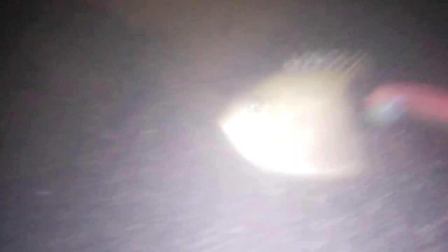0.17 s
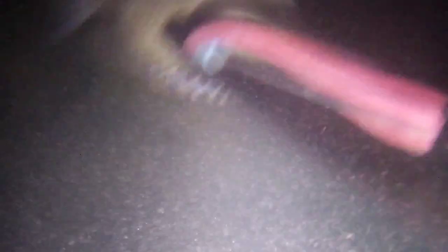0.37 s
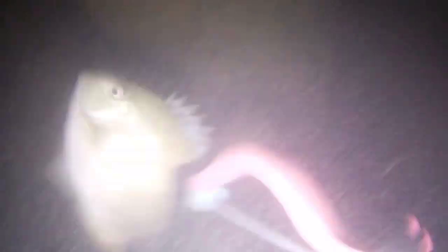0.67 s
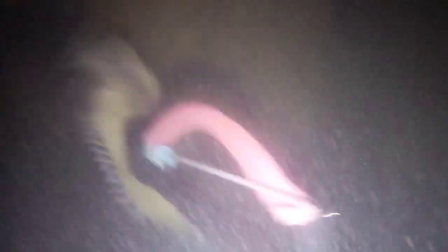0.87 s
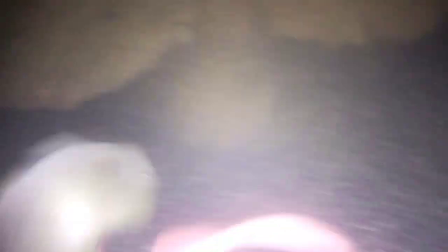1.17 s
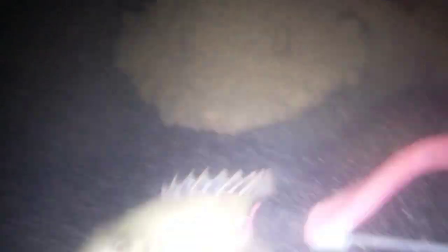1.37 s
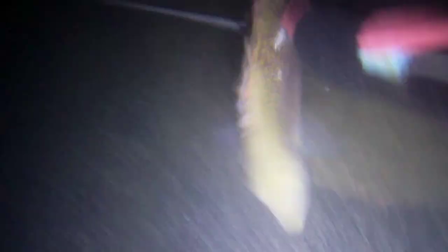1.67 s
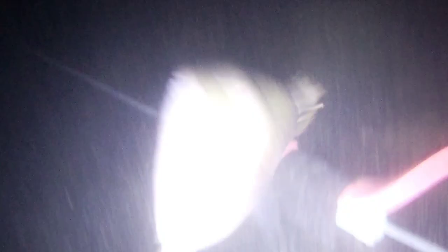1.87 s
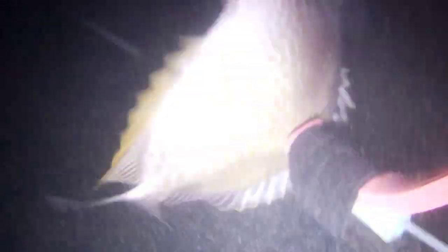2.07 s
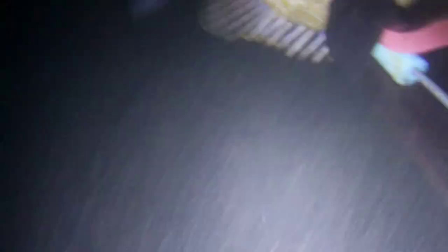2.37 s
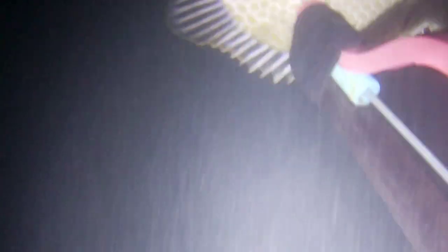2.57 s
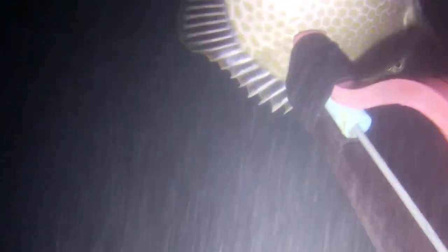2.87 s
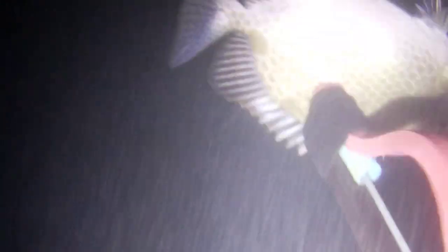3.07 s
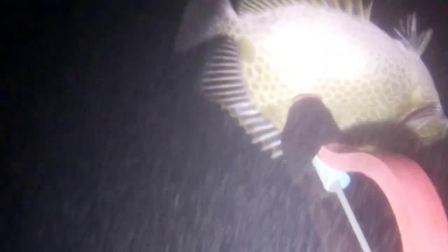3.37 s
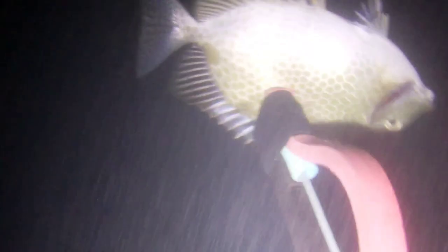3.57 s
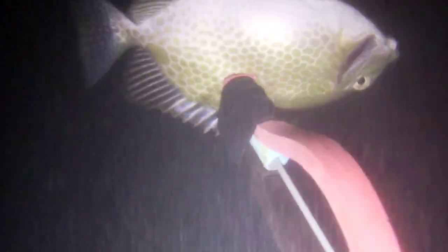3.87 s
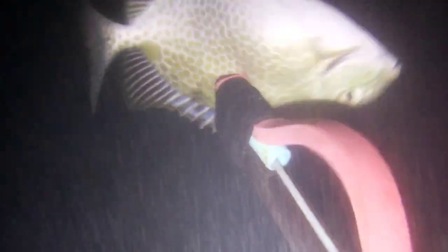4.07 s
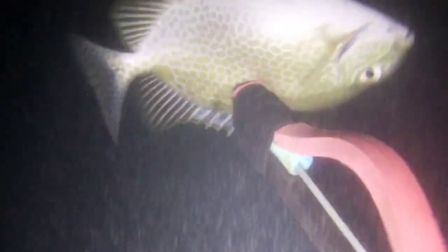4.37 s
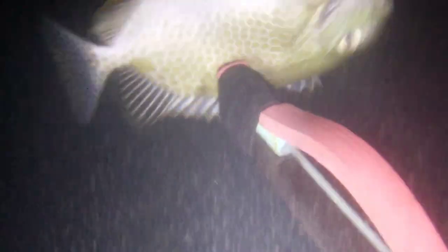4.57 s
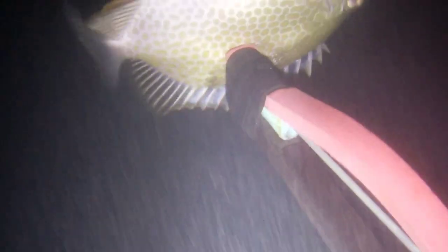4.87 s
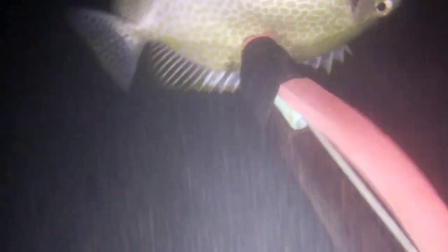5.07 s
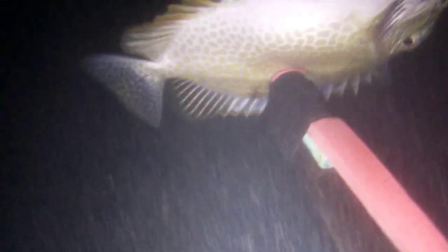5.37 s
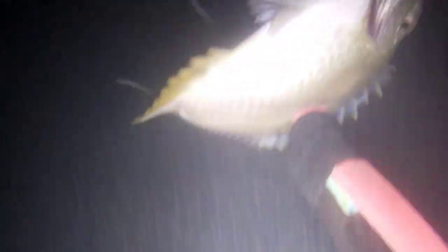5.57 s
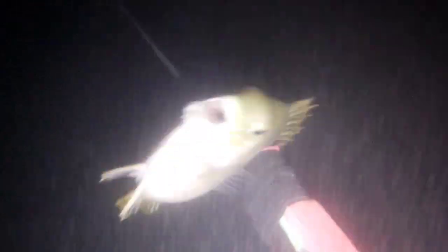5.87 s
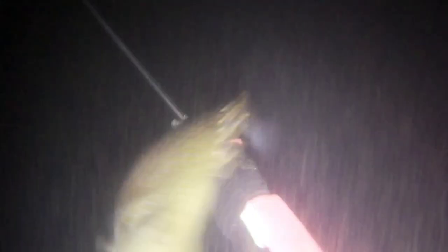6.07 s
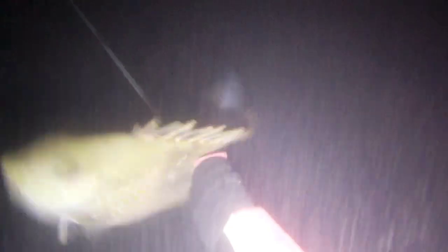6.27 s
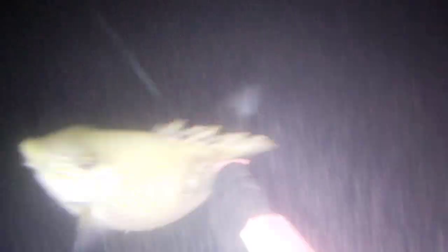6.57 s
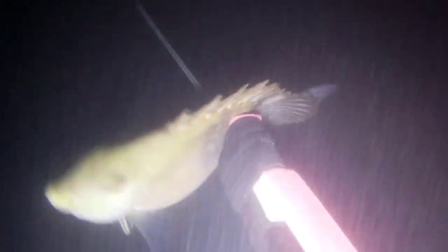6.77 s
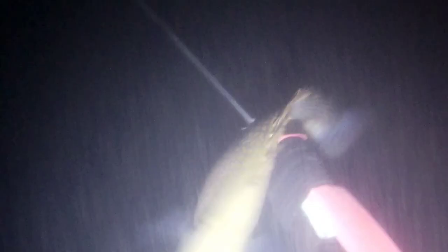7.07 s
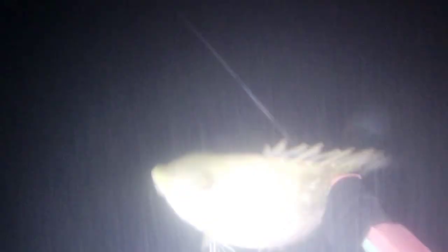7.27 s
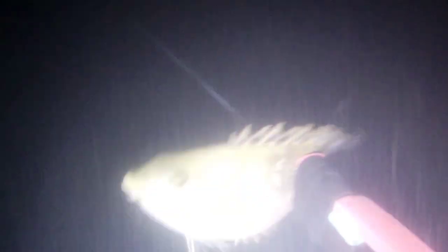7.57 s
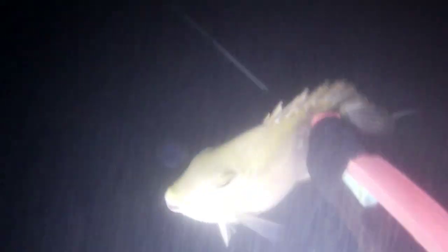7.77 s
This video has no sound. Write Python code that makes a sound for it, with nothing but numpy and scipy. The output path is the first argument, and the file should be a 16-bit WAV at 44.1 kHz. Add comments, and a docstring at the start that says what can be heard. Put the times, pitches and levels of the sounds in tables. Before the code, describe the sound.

Heard under water through a sealed housing on a speargun, muffled, close and almost mono. From 0 to 1.3 seconds a speared fish thrashes hard: hollow knocks crowd together, loudest around 0.5 to 0.8 and near 1.1, with deep thumps, sharp metallic ticks, gritty band-and-line rubbing and churning, rumbling water. It eases to scattered bumps until 2.3, then a quieter stretch of small ticks and fine rattle, with a brief shaft hum near 2.7 and a lower one at 3.0. From 3.1 to 4.5 heavy low thuds return in irregular tugs, with dull clunks, scrapes and short hums around 4. More clicks and knocks follow around 5.1 to 5.8, the shaft humming low from about 5.4. After 6 the jerks soften into lighter knocks, ticks and rubs until about 8, over fine watery snaps, fading rumble and faint steady hiss.

```python
"""Under water, a microphone in a sealed housing rides on a speargun while a fish struggles on the shaft.
Jerks along the gun make low dying swings (thumps), short tone-and-noise contacts (dull knocks) and
millisecond noise bursts (sharp ticks); knocks and ticks ring the housing. Band and line rub in dense
random slips and the shaft hums in near-sines. Water churns, rumbles, snaps and hisses as shaped noise.
The one microphone feeds both channels, which differ only by a faint scatter."""
import sys
import numpy as np
from scipy import signal
from scipy.fft import rfft, irfft
from scipy.io import wavfile

SR = 44100
rng = np.random.default_rng(int(sys.argv[2]) if len(sys.argv) > 2 else 0)


def unload_audio(sound):
    """Save the sound as a 16-bit wav file, at the path given as the first command line argument."""
    columns = np.transpose(np.atleast_2d(sound))
    # keep every value between -1 and 1, then stretch to whole-number steps
    steps = np.round(np.clip(columns, -1, 1) * 32767)
    wavfile.write(sys.argv[1], SR, steps.astype(np.int16))


N = 348390  # length of the scene in samples


def amp(db):
    """Turn decibels into a gain."""
    return 10 ** (np.asarray(db) / 20)


def rms_one(x):
    """Scale a sound to an rms level of 1."""
    return x / np.sqrt(np.mean(x ** 2) + 1e-20)


def in_time(rows):
    """Join the points of each curve column by straight lines, one value per sample."""
    times, *columns = np.transpose(rows)
    return [np.interp(np.arange(N) / SR, times, column) for column in columns]


def band(x, low_hz, high_hz, order=2):
    """Keep mainly the sound between two frequencies."""
    sos = signal.butter(order, [low_hz, high_hz], "band", fs=SR, output="sos")
    return signal.sosfilt(sos, x)


def coloured(spectrum):
    """Shape white noise to a given spectrum, then scale it to rms 1."""
    hz, db = np.transpose(spectrum)
    grid_hz = np.arange(N // 2 + 1) * SR / N + 1  # 1 Hz up, so the logarithm exists at the bottom
    gain = amp(np.interp(np.log(grid_hz), np.log(hz), db))
    return rms_one(irfft(rfft(rng.standard_normal(N)) * gain, N))


def drift(rate_hz):
    """Smooth noise twice into a slow random wander of rms 1; a higher rate wanders faster."""
    r = np.exp(-2 * np.pi * rate_hz / SR)
    wander = signal.lfilter([1], [1, -2 * r, r * r], rng.standard_normal(N + SR))
    return rms_one(wander[SR:])  # the first second only settles the filter


def resonance(x, hz, width_hz):
    """Ring one two-pole resonance with a gain of about 1 at its top; a narrow one rings longer."""
    r = np.exp(-np.pi * width_hz / SR)
    feed = (1 - r * r) / 2 * np.array([1, 0, -1])
    return signal.lfilter(feed, [1, -2 * r * np.cos(2 * np.pi * hz / SR), r * r], x)


def housing(x):
    """Ring the housing's modes side by side; their equal signs leave dark notches between them."""
    # ways the housing rings: (frequency [Hz], width [Hz], gain [dB])
    modes = [(242.8, 47, 0), (380, 423, 0.5), (539.7, 44, 5.5), (807, 167, 4.5), (864, 50, -1.5),
             (1120, 440, -39.5), (1880.5, 94, 11), (2355, 186, -4.5), (2640, 720, 1.5), (3250, 250, -17),
             (3840, 200, -12), (4880, 220, -9.5), (5550, 406, -3), (6000, 290, -49.5)]
    return sum(amp(db) * resonance(x, hz, width_hz) for hz, width_hz, db in modes)


def add(out, start_s, shape, peak_db):
    """Lay a short sound into the layer, scaled to its peak level."""
    at = max(round(start_s * SR), 0)
    scaled = amp(peak_db) * shape / np.abs(shape).max()
    out[at:at + len(shape)] += scaled[:N - at]


def struggle():
    """The fish tugs: levels of rub, rattle and water in dB rise, peak and fade over the calm levels."""
    # tugs: (peak time [s], base time to fade 20 dB [s], dull rub [dB], fine rattle [dB], water [dB])
    tugs = [(0.1, 0.15, -28, -40.5, -24.5), (0.33, .12, -30.5, -43.5, -24.5),
            (0.539, 0.28, -24, -36.5, -23), (0.729, 0.035, -21.5, -34, -28.5), (0.77, 0.11, -21, -35, -28),
            (0.955, .14, -20.5, -34, -30.5), (1.07, 0.06, -44, -54, -21.5), (1.2, 0.24, -29.5, -42.5, -28),
            (1.63, 0.33, -31.5, -41.5, -32), (1.89, 0.22, -37.5, -45, -31), (2.72, 0.1, -43, -38.5, -50),
            (3.03, 0.47, -34, -44, -33.5), (3.37, 0.1, -31, -39.5, -31), (3.6, .25, -34, -42.5, -37.5),
            (3.899, 0.2, -33, -48, -33), (4.25, 0.14, -30.5, -40.5, -29.5), (4.51, .2, -34, -44, -30),
            (4.59, 0, -39, -43, -44), (4.79, 0.33, -40, -41.5, -34.5), (5.12, 0.08, -29, -37.5, -39),
            (5.25, 0, -32.5, -43, -44), (5.34, .1, -48, -41.5, -38), (5.45, 0.14, -29.5, -37, -28),
            (5.83, 0.15, -30.5, -42.5, -33), (6.211, 0.13, -32.5, -45, -42), (6.5, .18, -34, -42.5, -39),
            (6.64, .06, -48, -43.5, -54), (6.83, .3, -35, -42.5, -33), (7.23, 0.3, -33.5, -44, -30.5),
            (7.529, 0.27, -35, -44, -38.5)]
    # speed of the rise: (rub [dB/s], rattle [dB/s], water [dB/s])
    rise = np.array((330, 200.5, 280))[:, None]
    # how much the base fade time is stretched: (rub [factor], rattle [factor], water [factor])
    linger = np.array((1.033, 1.23, 2.1))[:, None]
    # levels between tugs: (time [s], dull rub [dB], fine rattle [dB], water [dB])
    calm = [(0, -44, -52, -29), (1.1, -44.5, -56, -30.5), (1.5, -41.5, -50, -30.5),
            (2.2, -42, -43.5, -36.5), (2.65, -54.5, -46, -43.5), (3.5, -57, -46, -42),
            (4.1, -46.5, -43, -33.5), (4.7, -59, -47, -48), (5.1, -54.5, -48, -42), (5.7, -48, -44, -33.5),
            (6.15, -52.5, -48, -52), (6.4, -47, -49, -44), (6.75, -68, -56, -51), (7.1, -57, -47, -53),
            (7.9, -63, -55, -50)]
    t, power = np.arange(0, N, 32) / SR, 0  # every 32nd sample is enough for a level
    for s, fade_s, *peak_db in tugs:
        loss_db = np.where(t < s, rise * (s - t), 20 * (t - s) / (fade_s * linger))
        power = power + amp(np.array(peak_db)[:, None] - loss_db) ** 2
    tugged = [np.interp(np.arange(N) / SR, t, p) for p in power]
    return 10 * np.log10(tugged + amp(in_time(calm)) ** 2)


def thumps():
    """Each jerk swings the whole gun: a soft rise, then a few dying cycles that sag in pitch."""
    # jerks: (time [s], peak level [dB], swing frequency at the start [Hz])
    jerks = [(0.089, -23, 55.4), (0.548, -15, 42), (0.618, -12.5, 200), (0.679, -17, 105),
             (1.044, -16, 42.3), (1.118, -18, 46.7), (1.2, -11.5, 63), (1.522, -14.5, 46.3),
             (1.779, -19.5, 40), (1.871, -16, 39.7), (2.167, -19, 37.7), (2.312, -19, 260),
             (3.113, -10, 64), (3.343, -10.5, 62), (3.581, -11, 62), (3.768, -21, 121), (3.799, -14.5, 117),
             (3.877, -14, 79), (3.9, -12.5, 96), (4.037, -13, 108), (4.144, -11.5, 109), (4.188, -14, 115),
             (4.421, -15.5, 112), (4.485, -20, 53), (4.763, -19.5, 47.7), (4.776, -18.5, 110),
             (5.091, -19.5, 50.7), (5.232, -20, 100), (5.336, -18.5, 86), (5.428, -14, 118),
             (5.827, -22.5, 53.3), (6.193, -25, 47.3), (6.229, -20.5, 123), (6.476, -16.5, 56.5),
             (6.722, -25, 113), (6.822, -29, 42), (7.178, -23.5, 38), (7.508, -25, 79)]
    out, t = np.zeros(N), np.arange(SR // 4) / SR
    start_phases = rng.normal(3.47, 0.68, len(jerks))  # radians
    for (s, db, hz), phase in zip(jerks, start_phases):
        turns = t * hz
        rise = 1 - np.exp(-(turns / 0.36) ** 2)
        decay = amp(-6.0 * turns - 280.0 * t)  # 6 dB per turn plus 280 dB per second
        swing = np.sin(2 * np.pi * turns * (1 - 1.3 * t) + phase)
        add(out, s - .001, rise * decay * swing, db)  # starts 1 ms ahead of the listed time
    return out


def knocks():
    """A contact of a few ms with a scraping tail, coloured around its centre, rings the housing modes."""
    # dull knocks: (time [s], peak level [dB], centre frequency [Hz])
    dull_hits = [(0.038, -17.5, 503), (0.083, -28, 460), (0.105, -10.5, 550), (0.273, -22.5, 406),
                 (0.416, -19, 927), (0.472, -14, 308), (0.523, -5.5, 602), (0.62, -5, 334),
                 (0.76, -10.5, 231), (0.807, -7.5, 342), (0.835, -8, 600), (0.911, -15.5, 970),
                 (0.949, -15, 560), (1.039, -8.5, 560), (1.117, -5, 936), (1.196, -9.5, 770),
                 (1.406, -24, 834), (1.607, -23.5, 816), (1.677, -20.5, 363), (1.826, -16.5, 790),
                 (1.873, -13, 450), (1.898, -15, 440), (2.121, -20.5, 440), (2.311, -16, 500),
                 (2.704, -24, 856), (3.009, -23.5, 520), (3.077, -23, 447), (3.113, -20.5, 766),
                 (3.308, -26.5, 830), (3.342, -21, 513), (3.377, -12.5, 510), (3.58, -23, 817),
                 (3.878, -11, 466), (3.919, -18, 850), (4.191, -18, 484), (4.226, -24, 850),
                 (4.42, -19, 261), (4.478, -20.5, 520), (4.524, -15, 770), (4.762, -16.5, 230),
                 (4.778, -14.5, 450), (4.853, -22.5, 736), (5.023, -32, 800), (5.094, -24, 710),
                 (5.116, -14.5, 780), (5.193, -27.5, 323), (5.234, -17.5, 233), (5.433, -12, 744),
                 (5.594, -28, 564), (5.621, -17, 385), (5.8, -19.5, 578), (5.835, -12.5, 967),
                 (5.951, -23.5, 566), (6.189, -18, 380), (6.302, -19.5, 1027), (6.352, -20, 613),
                 (6.483, -24.5, 512), (6.572, -23.5, 940), (6.607, -19, 970), (6.721, -22, 332),
                 (6.792, -23, 390), (6.826, -21.5, 400), (6.895, -24, 534), (7.267, -21.5, 503),
                 (7.387, -19.5, 876), (7.512, -16, 570), (7.626, -20.5, 986)]
    out, t = np.zeros(N), np.arange(SR // 10) / SR
    grit = rng.standard_normal((len(dull_hits), len(t)))
    contact = t / .002 * np.exp(-t / 0.0023)
    scrape = .025 * np.exp(-t / 0.071)
    shapes = []
    for (s, db, hz), noise in zip(dull_hits, grit):
        tone = contact * np.sin(2 * np.pi * hz * t)
        rough = (contact + scrape) * 2.8 * band(noise, hz / 2.1, hz * 1.61)
        shapes.append(tone + rough)
    for (s, db, hz), shape in zip(dull_hits, housing(np.array(shapes))):
        add(out, s - .001, shape, db)
    return out


def ticks():
    """Metal touches: a millisecond of noise with a faint scratchy tail rings the upper housing modes."""
    # sharp ticks: (time [s], peak level [dB], treble share, held below 0.98 [dB])
    touches = [(0.0394, -17, -13.5), (0.086, -17, -30), (0.2347, -24.5, -2.5), (0.401, -29, -1),
               (0.415, -13, -27), (0.4642, -14.5, -1.5), (0.508, -27, -3), (0.5232, -9, -15),
               (0.549, -25, -20), (0.5714, -15, -7.5), (0.6195, -14.5, -9.5), (0.6876, -23, -33),
               (0.7138, -12, -7), (0.76, -5.5, -6.5), (0.7325, -15, -12), (0.808, -16, -9),
               (0.834, -11, -2.5), (0.8786, -16.5, -29), (0.9149, -20, -12), (0.9402, -15.5, -6.5),
               (0.967, -17.5, -14), (1.0894, -20.5, -10), (1.116, -21.5, -1), (1.195, -18.5, -11),
               (1.4088, -21.5, -20), (1.498, -24.5, -13), (1.5772, -30, 0), (1.6098, -23.5, -15),
               (1.7515, -19, 2), (1.8735, -13, -18), (1.898, -13, -12), (1.9311, -25, -3),
               (2.1246, -19.5, -19), (2.3143, -20.5, -3), (2.5442, -27, -3), (2.5732, -27, -3),
               (2.635, -24, -3), (2.6935, -34, -13), (2.7063, -15, -15), (2.815, -20.5, -4),
               (2.8628, -20.5, -2.5), (2.899, -22, 0), (2.9877, -27, -4), (3.0793, -19, -6),
               (3.114, -20.5, -19), (3.1893, -26, -6), (3.311, -21.5, -3), (3.3785, -17, -9.5),
               (3.6073, -21.5, -10), (3.839, -26, -3.5), (3.8776, -13.5, -8.5), (3.917, -15, -6),
               (4.0039, -25, -6), (4.0714, -21, -8), (4.1338, -29.5, -5), (4.2308, -12.5, -13),
               (4.3915, -27, -3), (4.478, -20.5, -20), (4.5257, -12, -19), (4.6206, -19, -9.5),
               (4.78, -23, -28), (4.8033, -13.5, -17.5), (5.024, -14.5, -6), (5.1187, -12.5, -10),
               (5.2585, -25, -16), (5.3214, -19.5, -11), (5.434, -17, -10.5), (5.592, -22, -10),
               (5.618, -21, 1), (5.6438, -20.5, -8.5), (5.7995, -19, -20.5), (5.8376, -18.5, -11),
               (5.998, -21.5, -5), (6.0313, -28, -3), (6.303, -27.5, 2), (6.351, -27.5, -2.5),
               (6.3793, -18.5, -6.5), (6.8968, -23, -2), (6.911, -24, -5), (7.0727, -23, -2),
               (7.198, -24, -15), (7.318, -34, -14), (7.3395, -22, -12), (7.3886, -29, 0),
               (7.4307, -24, -6), (7.4801, -22.5, -5.5), (7.557, -15.5, -13), (7.596, -25, 0),
               (7.66, -18, -15.5), (7.8261, -24, -1.5)]
    out, t = np.zeros(N), np.arange(SR // 16) / SR
    burst = t / .001 * np.exp(-t / .001) + .06 * np.exp(-t / .014)
    rung = housing(rng.standard_normal((len(touches), len(t))) * burst)
    lows = band(rung, 1726, 2310) + 0.35 * band(rung, 600, 1300)
    highs = band(rung, 3180, 6700)
    for (s, db, treble_db), low, high in zip(touches, lows, highs):
        share = np.clip(amp(treble_db), 0, .98)
        mix = np.sqrt(1 - share ** 2) * rms_one(low) + share * rms_one(high)
        add(out, s - .001, mix, db)
    return out


def rubbing(level_db, low_hz, high_hz, per_s, spread_db, clump_db):
    """Rubbing is many small slips: uneven random clicks, in clumps, heard through the housing."""
    happens = rng.random(N) < per_s / SR
    strength = amp(spread_db * np.minimum(rng.exponential(1, N), 4))
    slips = happens * rng.standard_normal(N) * strength
    rung = housing(slips * amp(clump_db * drift(22)))
    return amp(level_db) * rms_one(band(rung, low_hz, high_hz, order=4))


def dull_rub(rub_db, grip):
    """Band and line rub: dull slips in a low and a high band, whose balance shifts with time."""
    # balance of the rubbing: (time [s], upper housing modes over lower ones [dB])
    balance = [(0, -7), (1.2, -3), (1.9, 0), (2.5, 9.5), (3.0, 2.5), (3.8, 2.5), (4.3, 4.5), (4.6, 1.5),
               (5.0, 4), (5.4, -3), (5.7, 5), (6.2, -2.5), (6.64, 2), (6.8, -1), (7.05, 8), (7.5, 3),
               (7.9, 3)]
    tilt_db = in_time(balance)[0]
    low_db = rub_db - 4.5 - tilt_db / 2 + 3.8 * grip
    high_db = rub_db - 8.0 + tilt_db / 2 + 4.0 * grip
    low = rubbing(low_db, 150, 611, per_s=2500, spread_db=2.5, clump_db=2.5)
    high = rubbing(high_db, 704, 1046, per_s=2700, spread_db=5.0, clump_db=2.0)
    return low + high


def fine_rattle(rattle_db, grip):
    """Much denser slips in the treble make a fine rattle."""
    return rubbing(rattle_db + 1.8 * grip, 1600, 9000, per_s=12000, spread_db=1.6, clump_db=1.8)


def shaft():
    """The shaft bends and hums in spells: near-sines with fluttering pitch and level, quicker up high."""
    # spells in the lowest bending or a higher mode:
    # (time [s], length [s], rms level at the top before flutter [dB], pitch before waver [Hz])
    spells = [(2.709, 0.073, -37, 229), (2.81, .16, -53, 230), (2.863, 0.2, -50, 572),
              (2.989, 0.11, -27, 127), (3.888, .11, -23, 106.4), (4.03, 0.057, -30, 106.4),
              (4.143, 0.084, -23, 106.4), (4.276, 0.13, -48, 231), (5.419, .14, -24.5, 119),
              (5.6, 0.067, -23, 118.6), (5.669, .11, -24.5, 118.6), (5.722, .18, -41, 230),
              (5.822, .05, -33.5, 118.6), (5.926, 0.24, -46.5, 231.5), (6.629, 0.038, -32.5, 862),
              (6.914, 0.069, -41, 562), (7.185, 0.043, -44.5, 554), (7.65, 0.21, -51, 230),
              (7.662, 0.038, -38, 868)]
    attack_s, release_s, sag_db = 0.021, 0.018, -6  # the level sags by sag_db before the release
    waver_hz, waver_share, flutter_db = 6.97, .02, 4  # pitch: fixed Hz and share of pitch; level: dB
    out, t = 0, np.arange(N) / SR
    slow, quick = [2 * np.pi * np.cumsum(drift(rate)) / SR for rate in (12, 30)]
    flutters = [amp(flutter_db * drift(rate)) for rate in (10.5, 45)]
    for s, length, db, hz in spells:
        top, end = s + min(attack_s, length / 2), s + length
        envelope = np.interp(t, [s - .01, top, end, end + release_s], [0, 1, amp(sag_db), 0])
        swing = 2 * np.pi * hz * t + waver_hz * slow + waver_share * hz * quick
        tone = np.sin(swing) + 17.0 / hz * np.sin(2 * swing)  # with a weak octave
        out = out + amp(db) * envelope * flutters[int(hz > 150)] * tone
    return np.sqrt(2) * out  # a sine's peak is root 2 above its rms


def churning(rub_db, grip):
    """Thrashing churns the water: broad noise follows the rubbing, a low heave follows it half as much."""
    # churn level: (time [s], level against the rubbing [dB])
    churn_curve = [(0, -9.5), (1.15, -2), (1.35, -32.5)]
    heave_db = 5  # lifts the low part
    churn_db = in_time(churn_curve)[0]
    broad = rms_one(band(rng.standard_normal(N), 90, 1100))
    heave = rms_one(band(rng.standard_normal(N), 80, 190))
    broad_gain = amp(rub_db + churn_db + 4.0 * grip)
    heave_gain = amp(.5 * (rub_db - 29.5) + churn_db + 2.7 * grip + heave_db)
    return broad_gain * broad + heave_gain * heave


def water_rumble(water_db):
    """Water rumbles past: low noise that surges with the tugs and wanders in level."""
    # rumble spectrum: (frequency [Hz], relative level per Hz [dB])
    rumble_shape = [(8.8, -23.5), (15, 6), (51, 1), (157, -7.5), (222, -16), (400, -38.5), (520, -57),
                    (880, -120)]
    return amp(water_db + 3.03 * drift(7.0)) * coloured(rumble_shape)


def snaps(level_db, per_s):
    """Sparse fine snaps out of the water, perhaps shrimp: 1-2 ms noise bursts ring the upper modes."""
    starts = (rng.random(N) < per_s / SR) * amp(level_db + 3.4 * rng.standard_normal(N))
    r = np.exp(-1 / (0.0016 * SR))  # fades with a time constant of 1.6 ms
    fading = signal.lfilter([1], [1, -r], starts + 1e-18)  # the tiny offset keeps the numbers above zero
    return band(housing(fading * rng.standard_normal(N)), 1600, 13000)


def hiss():
    """A steady hiss lies below: noise with a fixed spectrum."""
    # hiss spectrum: (frequency [Hz], relative level per Hz [dB])
    hiss_shape = [(710, -55), (1200, -31.5), (1540, -23.5), (1870, 13.5), (2140, -19.5), (2770, -23),
                  (2990, -27.5), (4120, -5), (4520, -13.5), (5720, 3), (7750, -40), (10100, -66.5),
                  (17000, -120)]
    return amp(-59.5) * coloured(hiss_shape)


def scene():
    """Add all the layers, then spread them very slightly over two channels."""
    rub_db, rattle_db, water_db = struggle()
    grip = drift(30)  # slips come in clumps, partly together in all registers
    jolts = thumps() + knocks() + ticks()
    rubs = dull_rub(rub_db, grip) + fine_rattle(rattle_db, grip)
    water = churning(rub_db, grip) + water_rumble(water_db) + snaps(level_db=-25, per_s=11.0)
    mid = jolts + rubs + shaft() + water + hiss()
    # the channels differ by a faint scatter that follows the sound, more in the treble
    scatter = mid * drift(23)
    side = amp(-31) * (band(scatter, 2500, 9000, order=1) + 0.3 * scatter)
    return np.array([mid + side, mid - side])


def record(dry):
    """The microphone capsule rolls off above 6 kHz; from 11 kHz up the top is cut by a further 30 dB."""
    dull = signal.sosfilt(signal.butter(6, 6000, fs=SR, output="sos"), dry)
    return signal.sosfilt(signal.cheby2(6, 30, 11000, fs=SR, output="sos"), dull)


dry = scene()
out = record(dry)
unload_audio(out)
```